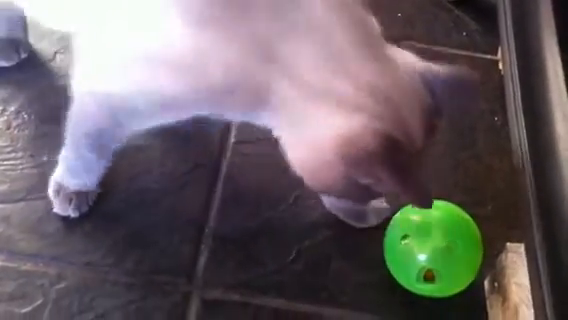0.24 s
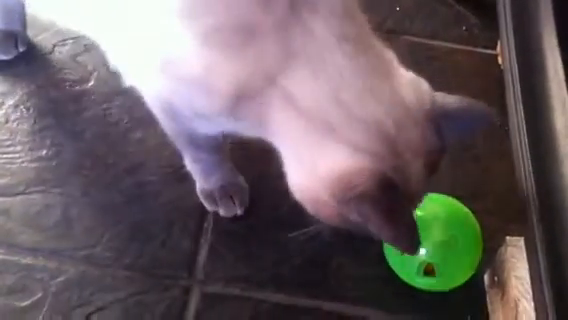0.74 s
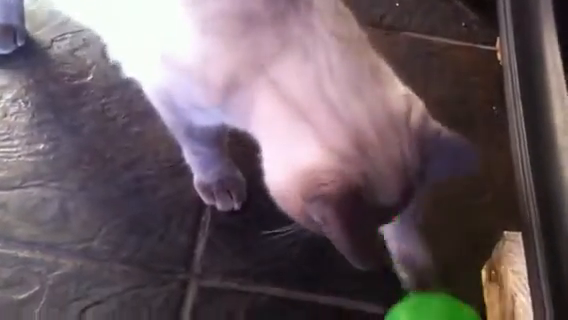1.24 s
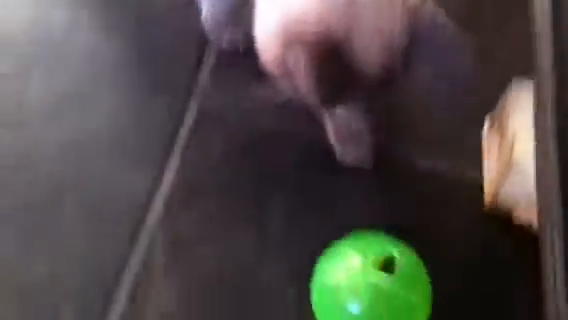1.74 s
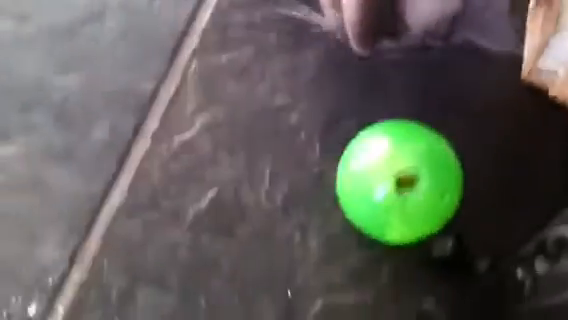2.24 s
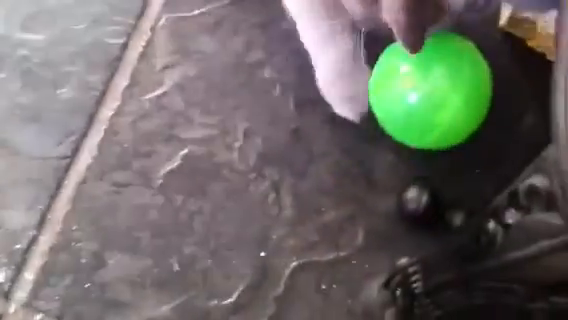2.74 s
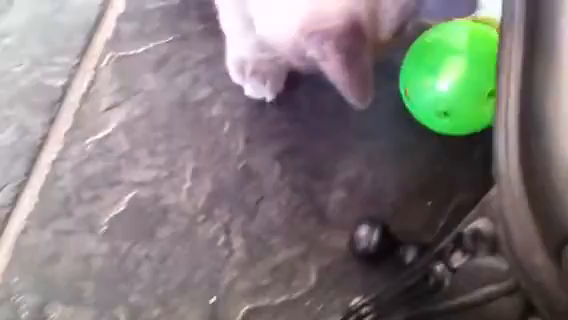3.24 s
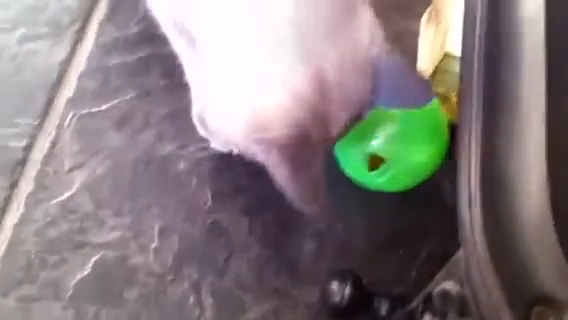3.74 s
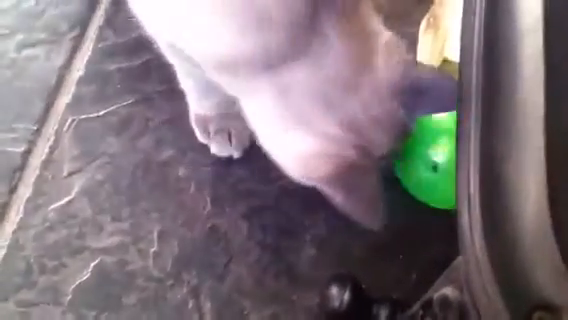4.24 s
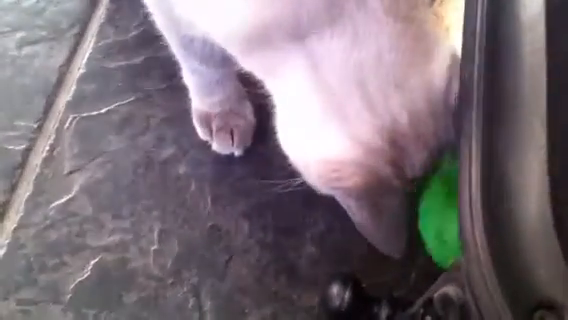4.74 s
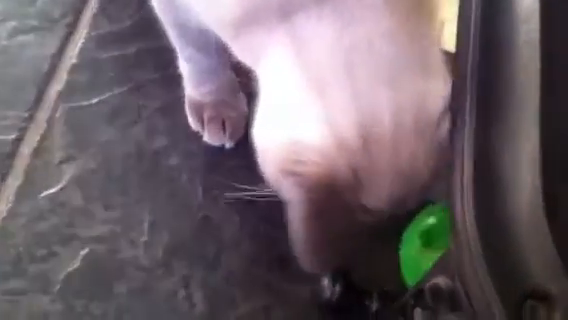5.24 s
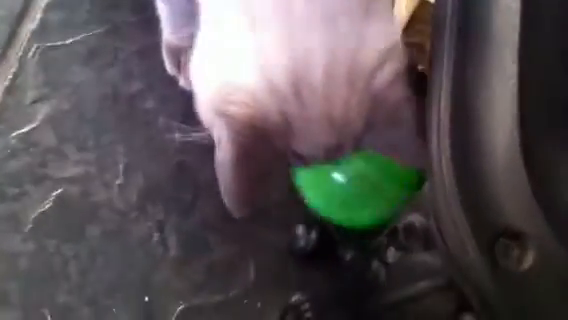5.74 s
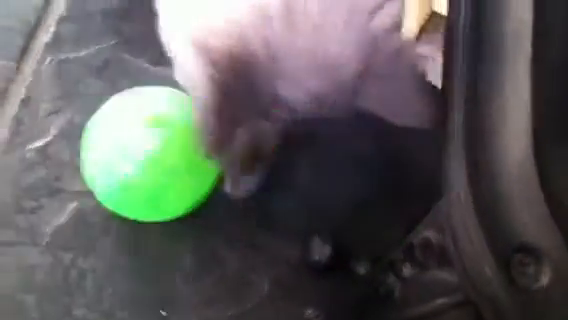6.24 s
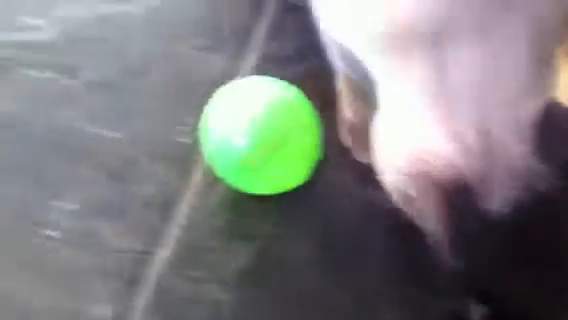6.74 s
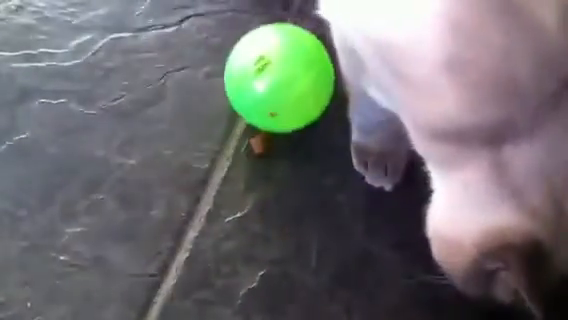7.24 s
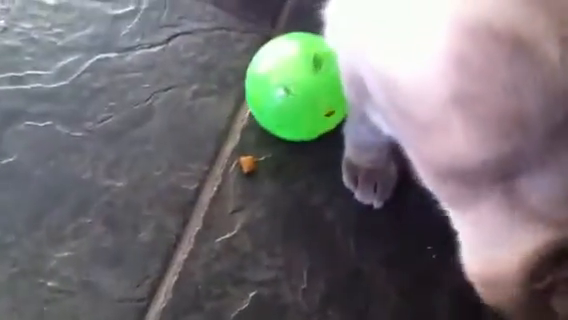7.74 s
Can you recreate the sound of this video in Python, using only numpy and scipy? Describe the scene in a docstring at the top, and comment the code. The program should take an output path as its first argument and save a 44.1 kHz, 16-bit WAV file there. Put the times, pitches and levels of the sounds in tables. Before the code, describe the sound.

In a hard-walled kitchen, a light hollow ball is nudged across tiles, its dry treats ticking crisply against the plastic. It starts with a quick clatter, pauses, rattles briefly again, then continues in a longer, busier run. Some contacts knock a metal bin with a dull, short-ringing thump. Quiet fridge hum and hiss lie beneath and remain alone at the end. Single-channel, close, small-microphone sound.

```python
"""A far refrigerator hums and whines over hiss throughout. From about one second a cat pushes a hollow plastic ball
with dry treats over kitchen tiles, in bouts: near 1 to 2.3 s, 2.8 to 3.7 s, then 4.3 to 7.7 s.
Treats and tiles click on the shell, filtered noise bursts, and the air inside answers near 1.2 kHz; rolling adds
patters of tiny contacts. From 1.3 to 6 s the ball now and then knocks a sheet-metal bin: a low push, ringing sines.
The kitchen answers ball and thuds with decaying noise echoes, and the last moments leave the refrigerator alone."""
import sys
import numpy as np
from scipy import signal
from scipy.fft import rfft, irfft, next_fast_len
from scipy.io import wavfile
from scipy.ndimage import map_coordinates

SR = 44100
rng = np.random.default_rng(int(sys.argv[2]) if len(sys.argv) > 2 else 0)


def unload_wav(signal):
    """Save mono or channel-first audio to the path in sys.argv[1] as 16-bit WAV at rate SR, clipped to [-1, 1]."""
    wavfile.write(
        sys.argv[1],
        SR,
        np.round(np.clip(np.atleast_2d(signal).T, -1, 1) * 32767).astype(np.int16),
    )


N = 352800  # samples, 8 seconds

# Clicks on the shell. Each row: time in seconds, relative level of the hollow in dB, relative level of the shell
# in dB, hardness as treble tilt in dB per octave, breadth in dB per octave squared (low is one ringing band,
# high is a wide snap).
CLICKS = [(1.0539, -64, -68.5, 1, 4), (1.211, -82, -68.5, 10.0, 5), (1.2255, -54, -68, 5.7, -6.9),
          (1.2946, -37, -50.5, 5.5, 3.0), (1.4136, -43, -59, 3.9, 6.5), (1.4398, -71, -48, -1, -7),
          (1.4638, -54, -46, 1.1, 8), (1.4693, -61, -38, 2, -11), (1.4884, -48, -54, -0.3, -1),
          (1.5066, -45.5, -36.5, 3.5, -3.0), (1.528, -58, -38.5, 3.4, 0), (1.5307, -45, -37.5, 5.6, -10.6),
          (1.577, -71, -44.5, -6, -11.5), (1.6044, -70, -55.5, -4.2, -3), (1.6357, -56, -61.5, -11.0, -3.5),
          (1.6713, -64, -57.5, -6, -7), (1.6914, -43.5, -68, -1.2, 3.9), (1.8248, -50, -59, -1.7, 8),
          (1.8856, -51, -66.5, -6, 9), (1.9118, -64, -42.5, 9.5, -2.5), (1.9512, -53, -50, 9, -4),
          (1.9745, -59, -46.5, 1.1, -4.4), (2.008, -57, -56, -5, -9.4), (2.095, -55.5, -79, -2.7, 3.1),
          (2.2891, -50, -54, 1.4, 6), (2.836, -54, -67, 0, 2.9), (2.9836, -59, -55, 7.1, -4),
          (3.0258, -46.5, -58, -5.5, 2.5), (3.0538, -60, -61, -3.7, -0.5), (3.0807, -63, -49, 3, -4),
          (3.0944, -63, -63.5, -9, 3.5), (3.1194, -66, -66.5, -7, 2), (3.1828, -62, -44, -4.5, -14),
          (3.2103, -58, -57, -6, -10), (3.2349, -63, -55, -0.5, -3), (3.2814, -51.5, -64, 6.2, 4),
          (3.3025, -44.5, -45, 0, -4), (3.3169, -40.5, -42, -3.5, -11.5), (3.324, -52, -51.5, 2, -1),
          (3.3762, -44.5, -56, 5.5, 1.5), (3.4077, -67, -59, -8, -6.5), (3.4487, -54, -68, -8, -0.0),
          (3.4634, -51.5, -60, -2.4, 1), (3.4794, -38, -49, -5.5, -1), (3.5074, -47.5, -43, -0.3, -3.5),
          (3.5715, -66, -59.5, -4, -1), (3.6728, -69, -70, -4, 1.5), (4.3168, -47.5, -79, -7.1, 2.7),
          (4.3257, -42.5, -61, 3, -2.0), (4.3325, -57, -50, -0.5, -4), (4.3912, -58, -67, -4, 3),
          (4.5891, -53.5, -64.5, -11, -4), (4.6195, -53.5, -85, -2.5, 10.4), (4.7143, -45, -65, 2.5, 3),
          (4.7235, -52, -68, 3.1, 1), (4.8986, -52, -65.5, 3, 9), (4.9398, -49, -47.5, 4.5, 0),
          (4.983, -29, -44.5, 1.2, 8.5), (4.9913, -45, -55, -2.0, -1.3), (5.0182, -40, -45.5, 0, 1),
          (5.0596, -37, -44, 1.5, 2.5), (5.0773, -40.5, -47, 5.1, 1), (5.101, -62, -56, -9, -2),
          (5.1564, -69, -69, -11, 12), (5.2098, -58.5, -57, -2.5, 5), (5.223, -57, -53.5, -2.5, 1),
          (5.2439, -61, -63, -3.5, 3.0), (5.26, -51, -62, -1.6, 6), (5.2795, -50, -71, -4.9, 7),
          (5.504, -67, -73, -1, 7), (5.5623, -49, -59.5, 0.2, 1), (5.6968, -51.5, -69.5, -0.5, 5.7),
          (5.7779, -50, -66.5, 5, 8.5), (5.8117, -44.5, -70, -4, -3), (5.8334, -30.5, -35.5, 4.5, 4),
          (5.8468, -37, -62, -2, 5), (5.8545, -41.5, -74, 4, 5), (5.9217, -43.5, -46.5, -3.6, 2),
          (5.9297, -45, -44, 1.6, -13), (5.961, -63, -45, 3, 0.5), (5.9753, -63, -36, 6.5, -6.5),
          (6.0366, -41, -56.5, 0.9, 2), (6.1585, -70, -56, 0, -21), (6.1805, -41.5, -53, 3.5, 2.5),
          (6.237, -53, -80, -1, 15), (6.2604, -37.5, -53, -6.5, 2), (6.2895, -74, -47.5, 12.5, -4.5),
          (6.3787, -41, -57, -8, -3), (6.4155, -42, -58, -4.5, 1.3), (6.4507, -37.5, -45.5, -3.5, -11.5),
          (6.459, -62, -52, 6, -5), (6.4948, -46.5, -68, -4.4, -2.8), (6.5105, -66, -64, -4, 2),
          (6.531, -45, -77, -5.8, 9), (6.5497, -51, -63.5, 4, -1), (6.5941, -51, -37.5, 8.5, -0.5),
          (6.603, -60, -36.5, 15.5, -11), (6.6152, -61, -61, 3, 13), (6.6612, -55, -50, -1, -2),
          (6.6704, -44, -57, 1.9, 4), (6.7211, -49, -58, -1.6, -8), (6.7332, -61, -54, -1, -3),
          (6.759, -76, -56, 0.0, -5), (6.8742, -39.5, -62.5, -1.9, 10), (6.8945, -40, -45.5, 4, 1),
          (6.906, -44, -62, -1, -2), (6.9271, -43, -48, 4, -1), (6.9492, -43.5, -56.5, -3, 2),
          (6.9782, -52, -62, -2.4, -1.4), (7.0148, -54, -57, 4, 1), (7.16, -47, -59, 3.5, 1.5),
          (7.1804, -65, -62.5, -3.5, -2), (7.2444, -61, -59, -2, -8), (7.2883, -60, -74.5, -4.4, 8),
          (7.3078, -59, -57.5, -7.5, 2.5), (7.3645, -54, -75, -4, 16), (7.3999, -44, -43.5, 0.7, -1),
          (7.451, -51.5, -67, 4.3, -1), (7.467, -69, -51.5, -3, -11), (7.48, -51, -64.5, -5, 6.5),
          (7.5495, -56, -52.5, 6.5, -0.5), (7.6323, -60, -65, -4.5, -3.7), (7.6592, -61.5, -61, 3, -4)]
# Plastic shell modes. Each row: frequency in Hz, width in Hz, level in dB.
SHELL_MODES = [(1547, 120, 2.5), (2390, 1200, 0.5), (3540, 710, 6.5)]
# Stiffer shell modes. Each row: frequency in Hz, width in Hz, level in dB.
RIM_MODES = [(4350, 710, 1), (5140, 300, 8), (6350, 2900, 0)]
# Brittle edge of a treat. Each row: frequency in Hz, width in Hz, level in dB.
SNAP_MODES = [(6340, 1070, 3), (8800, 2040, 2.5), (10530, 1100, 2)]
# The very top of a hard contact. Each row: frequency in Hz, width in Hz, level in dB.
SPARK_MODES = [(11200, 1150, 4.5), (13550, 3300, -8.5)]
CONTACT_S, PUFF_S = 0.0022, 0.00066  # decay times of the scrape on the shell and of the push on the air, s
TILT_PIVOT_HZ = 6000  # tilt and breadth leave the level unchanged here


def clicks():
    """Each contact shakes the air inside and the shell; hardness and breadth share it out among the modes."""
    start_s, hollow_db, shell_db, tilt, breadth = np.transpose(CLICKS)

    def touch(hz, gain_db):
        """The contacts as felt by the modes around hz."""
        octave = np.log2(hz / TILT_PIVOT_HZ)
        color_db = tilt * octave + breadth * octave ** 2
        return bursts(start_s, shell_db + gain_db + color_db, np.full(len(start_s), CONTACT_S))

    puffs = bursts(start_s, hollow_db + 32, np.full(len(start_s), PUFF_S))
    air = steep(steep(hollow(puffs), 1990, "low"), 800, "high")

    shell = ring(touch(hz=3120, gain_db=33.5), SHELL_MODES)
    shell = steep(shell, 4270, "low")

    rim = ring(touch(hz=4850, gain_db=37.0), RIM_MODES)
    rim = steep(steep(rim, 4770, "high"), 6370, "low")

    snap = ring(touch(hz=8800, gain_db=30), SNAP_MODES)
    snap = steep(steep(snap, 6560, "high"), 12300, "low")

    spark = ring(touch(hz=12500, gain_db=24.5), SPARK_MODES)
    spark = steep(spark, 10200, "high")
    return air + shell + rim + snap + spark


# Air modes in the ball. Each row: frequency in Hz, width in Hz, level in dB.
HOLLOW_MODES = [(960, 46, 7), (1046, 82, 8.5), (1175, 89, 9.5), (1202, 100, 8.5), (1295, 230, -2)]
# As the holes turn towards the floor or the air, the hollow changes pitch. Each row: time in seconds, pitch in Hz.
HOLLOW_PITCH = [(1.1, 1040), (1.69, 984), (1.94, 1344), (2.31, 1200), (2.79, 1230), (3.62, 1243),
                (4.24, 1000), (4.54, 1180), (5.35, 1164), (5.52, 1004), (5.68, 1166), (6.08, 954),
                (6.23, 1296), (7.0, 1320), (7.13, 1200), (7.7, 1290)]
TUMBLE_HZ = 110  # random detuning as the heap of treats shifts


def hollow(x):
    """The air modes nearest to the present pitch answer most."""
    pitch = np.interp(np.arange(N) / SR, *np.transpose(HOLLOW_PITCH))
    pitch = pitch + TUMBLE_HZ * wobble(30)
    out = np.zeros(N)
    for mode in HOLLOW_MODES:
        nearness = np.exp(-((pitch - mode[0]) / 170) ** 2)  # 170 Hz sets the reach of a mode
        out += ring(x[:N] * nearness if len(x) == N else x * nearness, [mode])
    return out


# The ball rolls. Each row: start in seconds, length in seconds, hollow rumble in dB, sliding treats in dB.
ROLLS = [(1.036, 0.039, -73.5, -76.5), (1.3, .03, -60, -77), (1.498, .12, -52, -55),
         (1.936, .05, -53.5, -58), (2.855, 0.069, -79, -78), (3.015, 0.21, -59.5, -69.5),
         (3.45, 0.14, -66, -68.5), (4.348, .05, -69, -69), (4.7, 0.44, -66, -71.5),
         (5.052, 0.12, -56.5, -57.5), (5.926, .16, -51, -58.5), (6.312, 0.13, -62, -67),
         (6.68, .06, -68, -67), (6.95, 0.029, -58.5, -63.5), (7.254, .05, -65.5, -82),
         (7.456, 0.096, -63, -65.5)]
RISE_DB_PER_S, FALL_DB_PER_S = 163, 122  # swell before the start, fade after the end
GRIT_DB = -10.5  # fine grit relative to the sliding


def rolling():
    """The rough tiles drum the hollow; treats slide and tick along the inner wall."""
    start_s, length_s, drum_db, slide_db = np.transpose(ROLLS)[..., None]
    t = np.arange(N) / SR - start_s
    rise_db = RISE_DB_PER_S * np.minimum(t, 0)
    fall_db = FALL_DB_PER_S * np.maximum(t - length_s, 0)
    swell_db = rise_db - fall_db

    drum = unit(steep(hollow(patter(300, spread_db=3.5)), 2560, "low"))
    slide = unit(ring(patter(600, spread_db=2), SHELL_MODES + RIM_MODES))
    grit = ring(patter(600, spread_db=4.5), SNAP_MODES + SPARK_MODES)
    grit = unit(steep(grit, 7500, "high"))

    drum_gain = amp(drum_db + swell_db).sum(0)
    slide_gain = amp(slide_db + swell_db).sum(0)
    return drum_gain * drum + slide_gain * (slide + amp(GRIT_DB) * grit)


# Ball on the bin. Each row: time in seconds, relative thud level in dB, metal ring in dB added to that level.
KNOCKS = [(1.292, -47, -26), (2.983, -46, -23), (4.313, -40, -23), (4.712, -50, -27), (4.979, -31, -10),
          (5.016, -36.5, -6.5), (5.059, -44, -8.5), (5.277, -43, -21), (5.56, -48, -19),
          (5.831, -33.5, -18), (5.92, -52, -9), (5.975, -38.5, -14.5), (6.034, -40, -14)]
# Dull body of the bin. Each row: frequency in Hz, width in Hz, level in dB.
PANEL_MODES = [(237, 140, 0), (454, 116, 2.5), (643, 520, -2)]


def thuds():
    """The ball's weight lands on the panel as a soft, low push."""
    start_s, thud_db, _ = np.transpose(KNOCKS)
    impacts = bursts(start_s, thud_db + 32, np.full(len(start_s), 0.00005))
    push = ring(impacts, PANEL_MODES)
    return steep(steep(push, 103, "high"), 990, "low")


# Sheet-metal modes of the bin. Each row: frequency in Hz, level in dB, time to fall by 60 dB in seconds.
BIN_MODES = [(227, -1.5, 0.99), (364.6, -9.5, 0.42), (695.4, -9, 0.51), (830, -22, 0.74), (971, -7, 0.59)]


def bin_knocks():
    """After a knock the sheet metal swells and rings unsteadily, each mode at a new strength."""
    out, t = np.zeros(N + SR), np.arange(SR) / SR
    swell = 1 - np.exp(-t / 0.019)
    for start_s, thud_db, metal_db in KNOCKS:
        for hz, mode_db, t60 in BIN_MODES:
            strength_db = rng.normal(0, 2)
            waver_db = strength_db + 4.5 * wobble(40, size=SR)
            level_db = thud_db + metal_db + mode_db + waver_db
            fade = amp(level_db - 60 * t / t60) * swell
            out[round(start_s * SR):][:SR] += fade * np.sin(2 * np.pi * hz * t)
    return out[:N]


# Echo decay of the kitchen. Each row: frequency in Hz, time to fall by 60 dB in seconds.
KITCHEN_DECAY = [(200, 0.72), (1200, 0.23), (4000, 0.26), (12000, 0.3)]


def kitchen(x):
    """Hard walls answer; the echo pattern is new every quarter second, as the ball moves on."""
    out, step = np.zeros(N + SR), SR // 4
    for at in range(0, N, step):
        hz, t, noise = signal.stft(rng.standard_normal(SR // 2), SR, nperseg=256)
        decay = amp(-60 * t / along(KITCHEN_DECAY, hz)[:, None])
        tail = signal.istft(noise * decay, SR, nperseg=256)[1]
        wet = signal.fftconvolve(x[at:at + step], tail / np.linalg.norm(tail))
        out[at + 90:][:len(wet)] += wet  # echoes start 90 samples (2 ms) late
    return out[:N]


# Color of the hum and hiss. Each row: frequency in Hz, relative level in dB.
AIR_COLOR = [(12, -76), (20, -40), (27, 5), (63, -20), (135, -6), (265, -6), (297, -3.5), (372, -14),
             (428, -11), (839, -18), (1140, -17.5), (1350, -20), (6350, -25), (15200, -25.5), (16500, -52)]
# Compressor whine. Each row: frequency in Hz, level in dB, shaft turns a second, depth of the waver in radians.
WHINE = [(1118, -79, 72, 0.87)]
AIR_DB = -65.5  # rms of hum and hiss, before a very slight drift


def fridge():
    """Broad hum and hiss, and a thin whine whose phase wavers once per turn of the compressor."""
    t = np.arange(N) / SR
    air = unit(filtered(rng.standard_normal(N), lambda hz: amp(along(AIR_COLOR, hz))))
    air_gain = amp(AIR_DB + 0.033 * wobble(1.86))
    waver_db = 2 * wobble(4)
    whine = np.zeros(N)
    for hz, db, turns, depth in WHINE:
        phase_waver = depth * np.sin(2 * np.pi * turns * t)
        whine += amp(db + waver_db) * np.sin(2 * np.pi * hz * t + phase_waver)
    return air_gain * air + whine


def bursts(start_s, db, decay_s):
    """Contacts: a sharp first touch, then a scrape of noise dying at its own rate."""
    t = np.arange(SR // 50) / SR
    decay = np.exp(-t / np.clip(decay_s, 1 / SR, 0.006)[:, None])
    shape = rng.standard_normal((len(start_s), len(t))) * decay
    shape[:, 0] = 5.0  # the first touch
    shape *= (amp(db) / np.linalg.norm(shape, axis=1))[:, None]  # db sets each burst's energy
    at = np.round(start_s * SR).astype(int)[:, None] + np.arange(len(t))
    return np.bincount(at.ravel(), shape.ravel(), N + SR)[:N]


def patter(rate, spread_db):
    """Random tiny contacts, rate a second, some stronger than most."""
    count = int(rate * N / SR)
    place, size = rng.random((count, 2)).T
    strength = amp(-spread_db * np.log(1.02 - size))
    return np.bincount((place * N).astype(int), strength * rng.choice([-1, 1], count), N)


def ring(x, modes):
    """x through a causal set of resonances, added with alternating sign."""
    def response(f):
        """Sum of second-order band-pass responses."""
        total = 0
        for k, (center, width, db) in enumerate(modes):
            damping = 1j * f * width
            total = total + (-1) ** k * amp(db) * damping / (center * center - f * f + damping)
        return total

    return filtered(x, response)


def steep(x, hz, kind):
    """A causal filter with a steep edge."""
    return signal.sosfilt(signal.butter(4, hz, kind, fs=SR, output="sos"), x)


def filtered(x, response):
    """x times a complex response of frequency."""
    m = next_fast_len(N + SR // 2)
    spectrum = rfft(x, m) * response(np.fft.rfftfreq(m, 1 / SR))
    return irfft(spectrum, m)[..., :N]


def wobble(rate, size=N):
    """A smooth random curve, rate knots a second."""
    knots = rng.standard_normal(int(size * rate / SR) + 4)
    return map_coordinates(knots, [np.arange(size) * rate / SR])


def along(points, hz):
    """Interpolate (Hz, value) points on a log frequency axis."""
    f, v = np.transpose(points)
    return np.interp(np.log(hz + 1), np.log(f + 1), v)


def amp(db):
    """Gain of a level in dB."""
    return 10 ** (np.asarray(db) / 20)


def unit(x):
    """x at rms 1."""
    return x / np.sqrt(np.mean(x ** 2) + 1e-20)


# Soft things swallow some treble of the echo. Each row: frequency in Hz, gain in dB.
WALLS = [(2500, 0), (5000, -3.5), (12000, -3.5)]


def scene():
    """Ball and bin in the kitchen, over the background."""
    ball = clicks() + rolling() + thuds()
    room = filtered(kitchen(ball), lambda hz: amp(along(WALLS, hz)))
    mix = ball + amp(-2) * room + bin_knocks() + fridge()
    return mix[None]  # one channel


TOP_HZ = 16200  # band limit


def record(dry):
    """The small microphone loses the deep bass; almost nothing is kept above the band limit."""
    thin = signal.lfilter(*signal.butter(2, 90, "high", fs=SR), dry)
    return filtered(thin, lambda hz: 1 / (1 + (hz / TOP_HZ) ** 120))


dry = scene()
out = record(dry)
unload_wav(out)
```